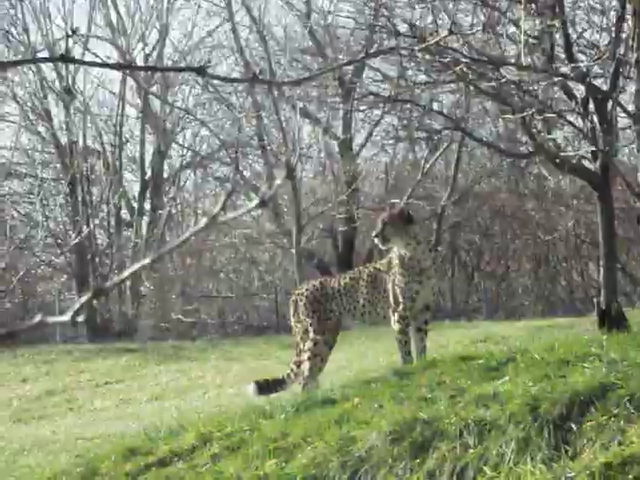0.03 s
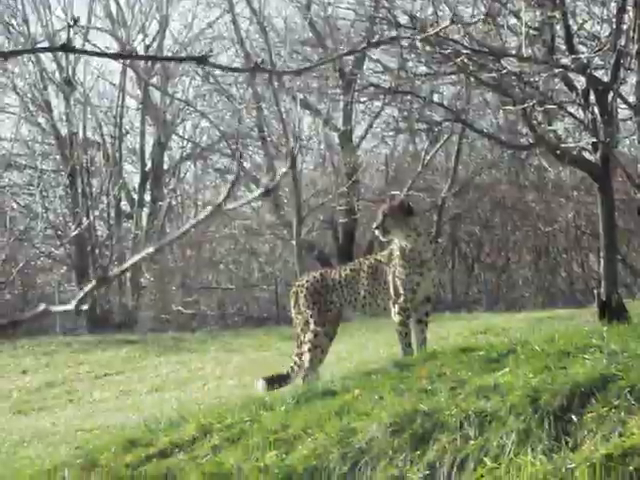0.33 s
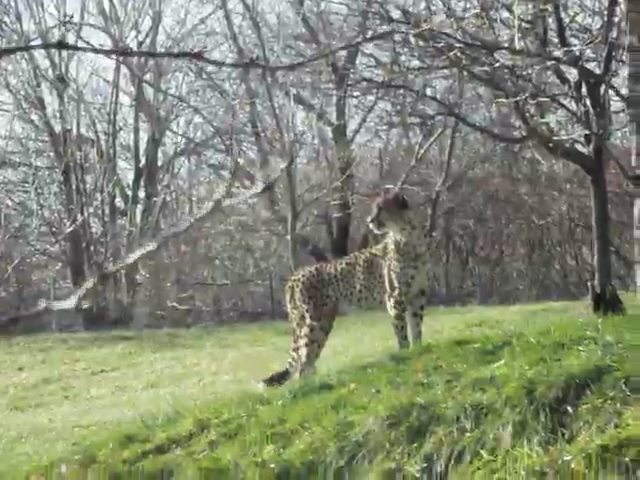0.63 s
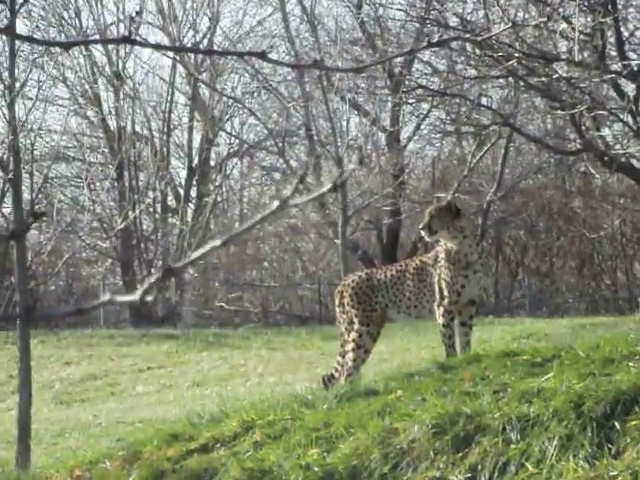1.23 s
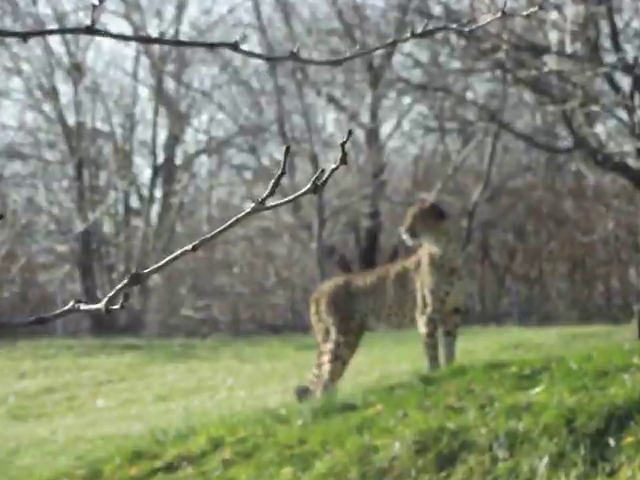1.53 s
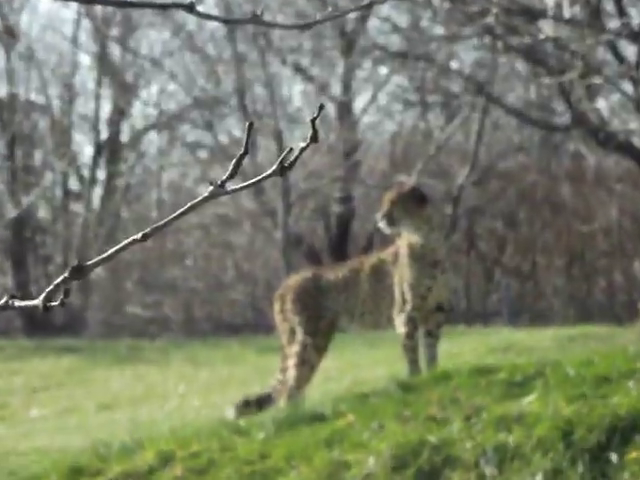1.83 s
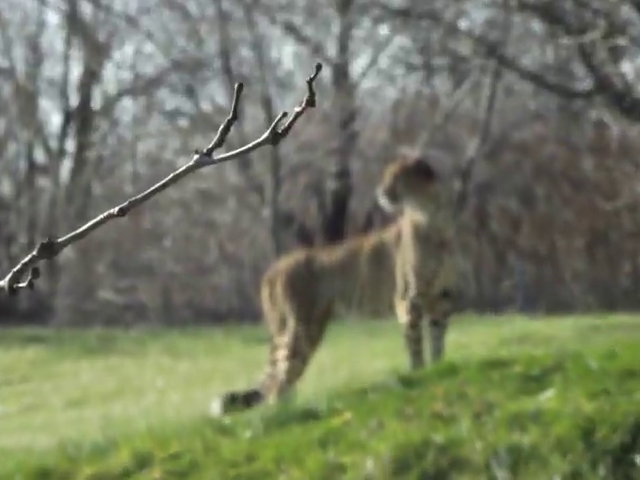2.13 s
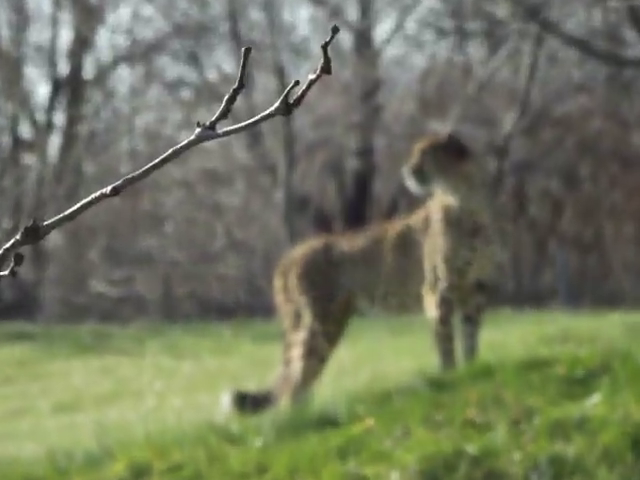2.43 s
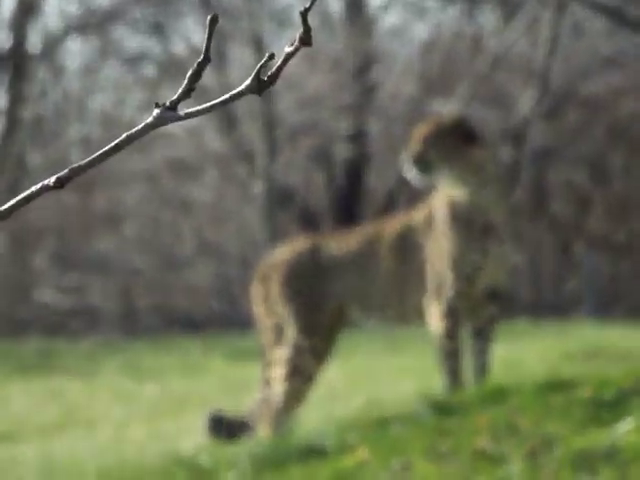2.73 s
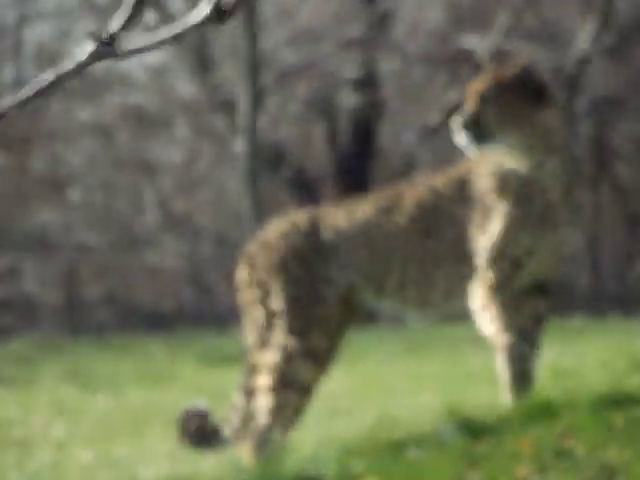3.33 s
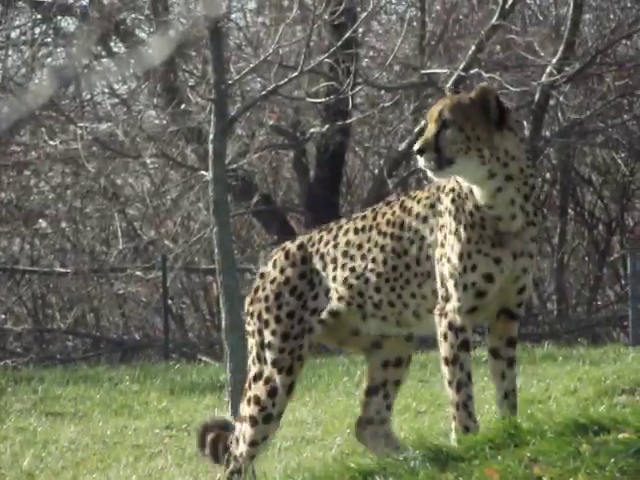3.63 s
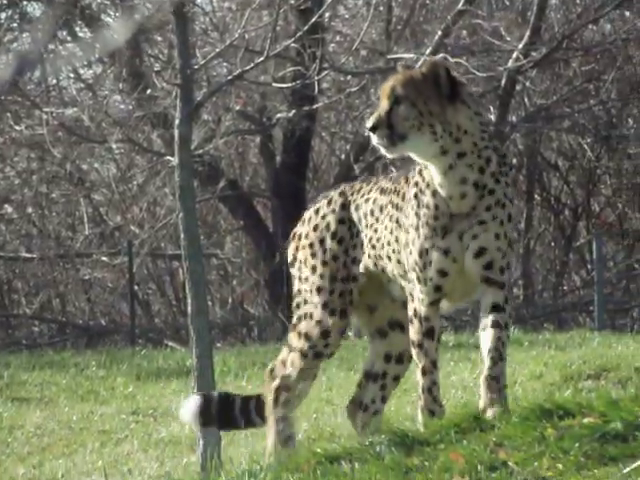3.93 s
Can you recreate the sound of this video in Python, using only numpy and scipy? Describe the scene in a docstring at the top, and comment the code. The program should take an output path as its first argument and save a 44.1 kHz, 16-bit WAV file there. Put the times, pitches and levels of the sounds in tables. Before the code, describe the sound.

A camera's zoom motor, close on the built-in microphone, starts after several light clicks, whirs with a slight rattle, knocks and stops. Faint rustling, a low hum and quiet outdoor air continue underneath.

```python
"""Camera zoom motor

A zoom motor whirs for two seconds, heard through the camera's own shell. A control ratchets and
clicks before it starts; the lens knocks near the end of its travel and stops. The lens mechanism
rustles faintly throughout and whines twice, over hand rumble, quiet outdoor air and a low hum."""
import sys
import numpy as np
from scipy import signal
from scipy.fft import rfft, irfft
from scipy.io import wavfile

SR = 44100
rng = np.random.default_rng(int(sys.argv[2]) if len(sys.argv) > 2 else 0)


def transcribe(u):
    """Save the signal u as a 16-bit wav file named by the first command-line argument.

    u: samples, shape (n,) or (channels, n), limited to [-1, 1]; the rate is SR.
    q: integer samples, one column per channel.
    """
    v = np.clip(np.atleast_2d(u).T, -1, 1)
    q = np.round(v * 32767).astype(np.int16)
    wavfile.write(sys.argv[1], SR, q)


N = 176400
T = np.arange(N) / SR


def amp(db):
    """Decibels to gain."""
    return 10 ** (np.asarray(db) / 20)


def unit(x):
    """Scale to rms 1."""
    return x / np.sqrt(np.mean(x ** 2) + 1e-20)


def curve(rows):
    """Each value column of a time table, linearly interpolated per sample."""
    times_s, *columns = np.transpose(rows)
    return [np.interp(T, times_s, column) for column in columns]


def drift(rate_hz):
    """Low-passed random motion, rms 1."""
    lowpass = np.exp(-(np.fft.rfftfreq(N, 1 / SR) / rate_hz) ** 2)
    return unit(irfft(rfft(rng.standard_normal(N)) * lowpass, N))


def colour(x, tone):
    """Minimum-phase filter from (Hz, dB) points; output rms 1."""
    size = 8192
    hz, db = np.transpose(tone)
    bin_hz = abs(np.fft.fftfreq(size, 1 / SR)) + 1
    log_gain = np.log(amp(np.interp(np.log(bin_hz), np.log(hz), db)))
    response = np.exp(np.conj(signal.hilbert(log_gain)))
    taps = np.fft.ifft(response).real[:size // 2]
    return unit(signal.fftconvolve(x, taps)[:N])


def gate(start_s, end_s, ramp_s):
    """On between two times, with linear ramps."""
    return np.clip(np.minimum(T - start_s, end_s - T) / ramp_s, 0, 1)


def add(mix, start_s, sound):
    """Mix a sound in at a time."""
    part = mix[round(start_s * SR):][:len(sound)]
    part += sound[:len(part)]


def zoom_motor():
    """The drive turns the gears and slides the barrel; the rattle grows uneven late in the travel."""
    # Drive speed. Each row: time in seconds, gear beats per second.
    drive_speed = [(1.42, 168), (1.47, 185), (1.505, 221), (1.56, 202), (1.62, 200), (1.70, 205),
                   (1.745, 221), (1.79, 202), (1.84, 200.5), (1.91, 206), (1.95, 219), (2.05, 224),
                   (2.08, 192), (2.15, 217), (2.21, 220), (2.24, 195), (2.29, 220), (2.33, 204),
                   (2.40, 206), (2.46, 220), (2.62, 223), (2.65, 195), (2.72, 221), (2.76, 195),
                   (2.82, 217), (2.86, 202), (2.92, 199), (3.0, 207), (3.05, 219), (3.13, 196), (3.22, 215)]
    # Drive loudness. Each row: time in seconds, gear level in dB, rattle level in dB.
    drive_levels = [(1.44, -25.5, -34), (1.51, -26.5, -32.5), (1.6, -27.5, -34), (1.8, -27.5, -30),
                    (1.88, -26.5, -36), (2.05, -27.5, -30), (2.12, -27.5, -32.5), (2.35, -27.5, -32.5),
                    (2.65, -28.5, -30), (2.85, -30, -29.5), (3.02, -28.5, -25.5), (3.085, -33.5, -45),
                    (3.115, -32, -22.5), (3.15, -27, -33), (3.19, -30, -26), (3.22, -29, -28)]
    beat_hz = curve(drive_speed)[0]
    gear_db, rattle_db = curve(drive_levels)
    beat_count = np.cumsum(beat_hz) / SR
    contact = unit(np.exp(-(beat_count % 1) / 1.2))  # jumps at each beat, then decays
    gears = amp(gear_db) * gear_beats(beat_hz, beat_count, contact)
    rattle = amp(rattle_db) * barrel_rattle(contact)
    surge_from_s, surge_db_per_s = 2.5, 2
    surge_db = surge_db_per_s * np.maximum(T - surge_from_s, 0) * drift(rate_hz=45)
    return gate(start_s=1.412, end_s=3.222, ramp_s=0.024) * (gears + amp(surge_db) * rattle)


def gear_beats(beat_hz, beat_count, contact):
    """Gears beat the shell with alternating push and pull, falling unevenly at high speed."""
    smooth_below_hz, base_jitter_s, chatter_s_per_hz = 190, 20e-6, 7e-6
    lean, force_spread, roughness = 0.06, 0.16, 0.28
    onsets = np.flatnonzero(np.diff(np.floor(beat_count)))
    force_scatter, time_scatter = rng.standard_normal((N, 2))[:len(onsets)].T
    jitter_s = base_jitter_s + chatter_s_per_hz * np.maximum(beat_hz[onsets] - smooth_below_hz, 0)
    shifts = np.round(time_scatter * jitter_s * SR).astype(int)
    push_pull = (-1.0) ** np.arange(len(onsets)) + lean
    beats = np.zeros(N)
    beats[np.clip(onsets + shifts, 0, N - 1)] = push_pull * (1 + force_spread * force_scatter)
    grit = roughness * contact * rng.standard_normal(N)
    # Gear spectrum through the shell. Each row: frequency in Hz, relative level in dB.
    gear_tone = [(300, -31.5), (900, -26.5), (1030, -14.5), (1105, -10), (1220, -7), (1285, -6),
                 (1328, -0.5), (1375, -1.5), (1500, -11.5), (1610, -3), (1665, -5.5), (1713, -1.5),
                 (1765, -5.5), (1920, -13.5), (2080, -21.5), (2250, -17.5), (2450, -14), (2800, -14),
                 (3150, -21), (3600, -46), (5400, -36.5), (6300, -83.5)]
    return colour(unit(beats) + grit, gear_tone)


def barrel_rattle(contact):
    """The sliding lens barrel makes patchy noise, pulsed by gear contact."""
    # Sliding spectrum. Each row: frequency in Hz, relative level in dB.
    rattle_tone = [(300, -38.5), (1000, -24), (1400, -16), (2080, -21), (2250, -17.5), (2550, -13),
                   (2800, 3.5), (2950, -5), (3110, 2.5), (3250, -12), (3420, -8.5), (3620, -25),
                   (4200, -25), (4600, -17.5), (5150, -30.5), (5500, -25), (6300, -77)]
    patchy_db = 3.2 * drift(rate_hz=330)
    return colour(contact * amp(patchy_db) * rng.standard_normal(N), rattle_tone)


def clicks():
    """Small blows with a brief scuff ring the shell's modes and give the body a low push."""
    # Shell modes. Each row: frequency in Hz, relative level in dB, T60 in seconds.
    shell_modes = [(1194, -5, 0.013), (1393, -0.5, 0.026), (1592, 0, .014), (1730, -5.5, 0.026),
                   (2130, 0.5, 0.0044), (2404, -5, 0.019), (2820, 6, 0.0099), (3033, 6.5, 0.0055),
                   (4440, -18.5, .012)]
    # Control and mechanism blows. Each row: start in seconds, level in dB, tilt in dB/octave, scuff gain.
    blows = [(0.3025, -32.5, -11, .2), (.311, -28.5, 3.5, 0.12), (0.4906, -24.5, -1, 0.045),
             (.5995, -32, -10, .3), (.642, -37.5, 0.5, .3), (0.6825, -34.5, 0.5, 0.09),
             (.9478, -32, -17, 0.083), (1.0444, -33, -2, 0.092), (1.0762, -20.5, 8, 0.025),
             (1.1033, -17.5, 7, 0.083), (1.1242, -15, 4, 0.13), (1.1419, -16, 3, 0.077),
             (1.1606, -16.5, 3.5, 0.017), (1.276, -11.5, 5.5, 0.077), (1.3215, -24.5, -19, 0.098),
             (1.351, -26.5, -16, 0.23), (1.4034, -21, -11, 0.039), (1.4112, -14.5, -6.5, .03),
             (1.417, -15.5, -3, 0.092), (3.0533, -13, -0.5, 0.039), (3.056, -9, -3, 0.15),
             (3.0649, -6, -6.5, 0.023), (3.213, -17, 19, 0.1), (3.2173, -13.5, -4.5, 0.089),
             (3.3106, -28.5, -17, .1)]
    scuff_s, equivalent_s = 0.0024, 0.005
    thump_hz, thump_relative_db, thump_decay_s = 150, -18, 0.0054
    out, t = np.zeros(N), T[:SR // 16]
    thump = np.sin(2 * np.pi * thump_hz * t) * np.exp(-t / thump_decay_s)
    lowpass = np.vstack([signal.butter(2, 4220, fs=SR, output="sos"),
                         signal.cheby1(10, 1, 5300, fs=SR, output="sos")])
    for start_s, level_db, tilt_db_per_octave, scuff in blows:
        ring = np.zeros(len(t))
        for k, (hz, mode_db, t60_s) in enumerate(shell_modes):
            envelope = amp(mode_db + tilt_db_per_octave * np.log2(hz / 2000) - 60 * t / t60_s)
            ring += (-1) ** k * envelope * np.sin(2 * np.pi * hz * t)  # modes alternate in direction
        blow = scuff * rng.standard_normal(len(t)) * np.exp(-t / scuff_s)
        blow[0] = 1
        click = signal.sosfilt(lowpass, signal.fftconvolve(blow, ring)[:len(t)])
        click *= np.sqrt(equivalent_s * SR / np.sum(click ** 2))  # energy of rms 1 over equivalent_s
        add(out, start_s, amp(level_db) * (click + amp(thump_relative_db) * thump))
    return out


def lens_knock():
    """One sharp push and rebound as the lens nears the end of its travel."""
    start_s, gain_db, width_s = 3.0653, -1.5, 0.00013
    out = np.zeros(N)
    u = T[:SR // 16] / width_s
    add(out, start_s, amp(gain_db) * u * (2 - u) * np.exp(-u))
    return out


def lens_rustle():
    """The lens mechanism rustles faintly and unevenly."""
    # Rustle spectrum. Each row: frequency in Hz, relative level in dB.
    rustle_tone = [(500, -37), (950, -15.5), (1150, -6), (1330, 4), (1500, -3), (1700, -4.5), (2000, -16),
                   (2500, -17.5), (2830, -6.5), (3050, -13), (3400, -24), (4500, -21.5), (5400, -45.5),
                   (6200, -91)]
    # Rustle loudness. Each row: time in seconds, level in dB.
    rustle_levels = [(0, -36.5), (.11, -39.5), (.19, -35), (.24, -41.5), (.3, -32), (.345, -42), (.39, -32),
                     (.45, -39.5), (.51, -35), (.57, -38), (.68, -32), (.75, -37.5), (.81, -34.5),
                     (.9, -42), (.96, -38.5), (1.03, -43.5), (1.13, -30.5), (1.19, -44), (1.25, -32.5),
                     (1.33, -34), (1.39, -40), (3.24, -46.5), (3.3, -36), (3.37, -38.5), (3.45, -35.5),
                     (3.51, -44), (3.57, -39), (3.64, -44.5), (3.7, -37), (3.75, -41.5), (3.83, -35.5),
                     (3.91, -42.5), (4, -36)]
    noise = rng.standard_normal(N)
    patchy_db = 3 * drift(rate_hz=43)
    return amp(curve(rustle_levels)[0]) * colour(noise * amp(patchy_db), rustle_tone)


def focus_whine():
    """The focus motor runs twice, briefly; its raspy partials waver together in pitch."""
    # Motor runs. Each row: start in seconds, end in seconds, level in dB.
    runs = [(1.275, 1.36, -40), (3.32, 3.426, -38.5)]
    # Motor partials. Each row: frequency in Hz, relative level in dB.
    partials = [(1082, 0), (2923, -12), (4474, -19)]
    waver, rasp = 0.021, 0.13
    clock_s = T + np.cumsum(waver * drift(rate_hz=92)) / SR
    whine = sum(amp(db) * np.sin(2 * np.pi * hz * clock_s) * (1 + rasp * drift(rate_hz=200))
                for hz, db in partials)
    envelope = sum(amp(db) * gate(start_s, end_s, ramp_s=0.0033) for start_s, end_s, db in runs)
    return envelope * unit(whine)


def hand_rumble():
    """The hand shifts on the camera body with a soft rumble."""
    # Rumble loudness. Each row: time in seconds, level in dB.
    rumble_levels = [(0, -40), (.4, -37), (.75, -43), (1.0, -43), (1.15, -38), (1.4, -40), (1.8, -37),
                     (2.3, -43), (2.75, -35), (3.05, -38), (3.3, -46), (4, -44)]
    # Rumble spectrum. Each row: frequency in Hz, relative level in dB.
    rumble_tone = [(10, -7.5), (30, 6), (60, -11), (140, -19.5), (300, -29), (800, -56), (3000, -92)]
    return amp(curve(rumble_levels)[0]) * colour(rng.standard_normal(N), rumble_tone)


def outdoor_air(level_db=-34, sway_db=0.7):
    """Outdoor air rumbles, swaying slightly in level."""
    # Air spectrum. Each row: frequency in Hz, relative density in dB.
    air_tone = [(10, 4), (25, -1.5), (50, -8), (90, -10.5), (170, -12.5), (280, -16), (400, -23.5),
                (600, -20), (900, -23.5), (2000, -29.5), (3500, -34), (4800, -35.5), (5500, -40),
                (6300, -82.5)]
    air = colour(rng.standard_normal(N), air_tone)
    return air * amp(level_db + sway_db * drift(rate_hz=3))


def machine_hum(pitch_hz=71.6, wander_hz=2, level_db=-37.5, sway_db=3.6):
    """A distant machine hums, wavering in pitch and level."""
    hz = pitch_hz + wander_hz * drift(rate_hz=10.8)
    hum = np.sin(2 * np.pi * np.cumsum(hz) / SR)
    return amp(level_db) * unit(hum * amp(sway_db * drift(rate_hz=10)))


def scene():
    """All sources at the one built-in microphone."""
    camera = zoom_motor() + clicks() + lens_knock() + lens_rustle() + focus_whine()
    return (camera + hand_rumble() + outdoor_air() + machine_hum())[None]


def record(dry):
    """Soft overload on the loudest clicks, then a band limit."""
    ceiling, cutoff_hz = 0.72, 16500
    limited = dry / (1 + (dry / ceiling) ** 8) ** (1 / 8)
    lowpass = signal.firwin(511, cutoff_hz, window=("kaiser", 9), fs=SR)
    return signal.oaconvolve(limited, lowpass[None], "same")


dry = scene()
out = record(dry)
transcribe(out)
```